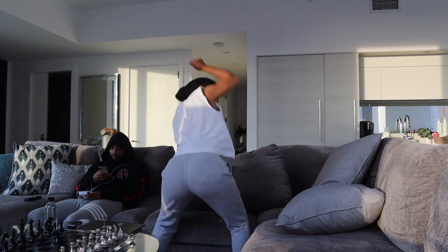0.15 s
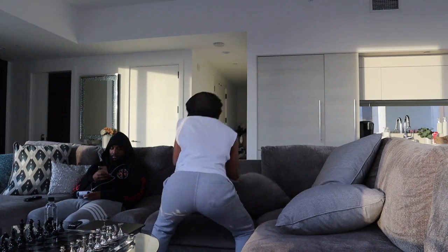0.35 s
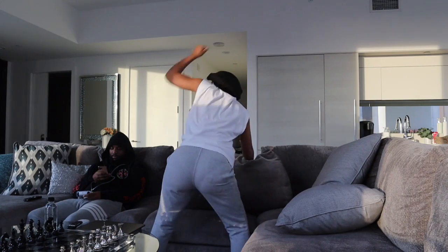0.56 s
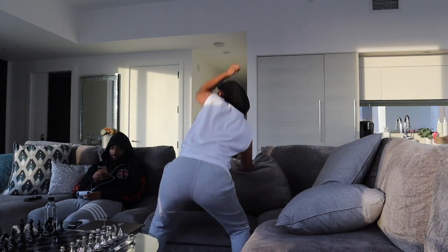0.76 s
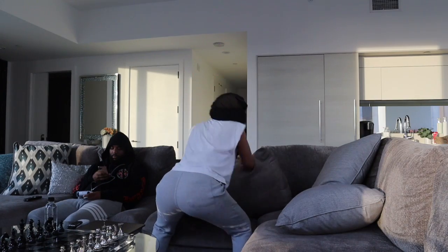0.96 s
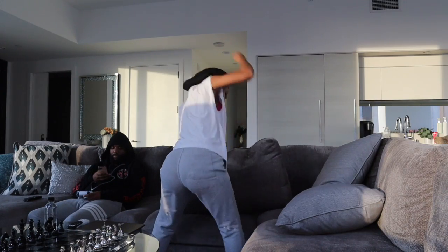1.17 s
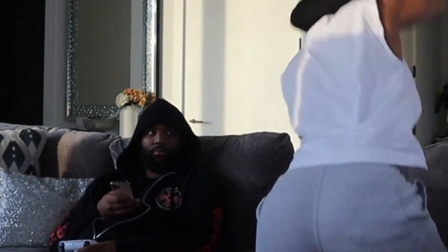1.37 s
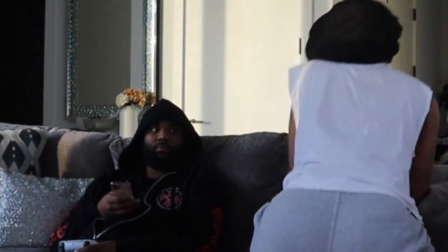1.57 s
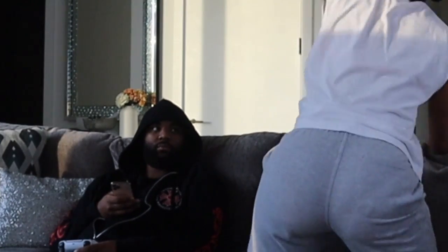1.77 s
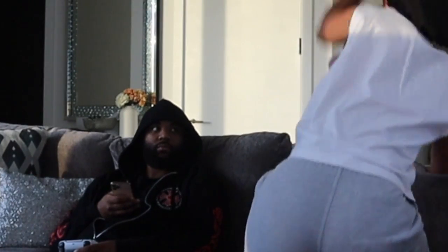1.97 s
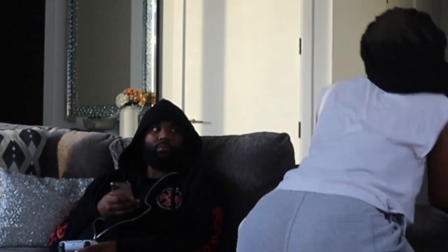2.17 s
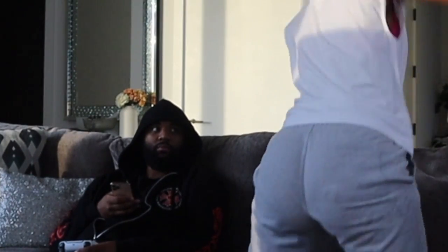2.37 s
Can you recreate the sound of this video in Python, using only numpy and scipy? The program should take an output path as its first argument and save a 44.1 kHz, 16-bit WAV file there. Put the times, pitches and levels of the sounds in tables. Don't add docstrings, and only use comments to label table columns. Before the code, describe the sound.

A hand whacks a soft couch cushion four times, boomy thuds ringing briefly in a hard-walled room

```python
import sys
import numpy as np
from scipy import signal
from scipy.fft import rfft, irfft
from scipy.io import wavfile
from scipy.ndimage import uniform_filter1d

SR = 44100
rng = np.random.default_rng(int(sys.argv[2]) if len(sys.argv) > 2 else 0)


def volts_from_decibels(level):
    exponent = np.asarray(level, float) / 20
    return 10 ** exponent


def persist_wave(psi):
    counts = np.round(np.clip(psi, -1, 1) * 32767).astype(np.int16)
    wavfile.write(sys.argv[1], SR, np.atleast_2d(counts).T)


N = 107207

# f/Hz, level per Hz/dB
HISS = [(13, -38), (22, -3.5), (225, -6), (280, -11.5), (377, -9.5), (409, -16), (702, -15), (782, -16.5),
        (14200, -44.5)]
# f/Hz, side over mid/dB
HISS_SIDE = [(60, -15), (110, -20), (200, -7.5), (370, -3.5), (670, -0.5), (1230, 2), (2240, 4), (4100, 5),
             (7490, 4), (13700, 3.5)]
# f/Hz, rms level/dB, width/Hz
HUM = [
    (35.3, -71, 3.3),
    (78.3, -51, 4.4),
    (376, -54, 2.06),
    (690, -108, 3.1),
]
# f/Hz, level/dB
RUSTLE = [(100, -5.5), (400, 10), (1000, -3.8), (2500, -9.5), (5000, -20), (9000, -41), (14000, -42)]
# t/s, level/dB, f/Hz
TICKS = [
    (0.042, -54, 4960),
    (0.049, -48.5, 2830),
    (1.128, -55, 11000),
    (1.135, -50.5, 10500),
]
# t/s, level/dB, push length/ms, slap level/dB, blow index
CONTACTS = [(0.3397, -8.5, 1.4, -15, 0), (0.3428, -3.5, 0.43, -22, 0), (0.3472, -14, 1.6, -22, 0),
            (0.3493, 1, 1.25, -1.5, 0), (0.3513, -3, 0.8, -12, 0), (0.3552, 1.5, 2.1, -29, 0),
            (0.933, -9, 2.3, -20, 1), (0.9407, -9, 1.67, -11, 1), (0.9424, -11.5, 1.02, 2, 1),
            (0.9466, -1, 2.17, -32, 1), (1.493, -35, 1.6, -40, 2), (1.516, -28, 2.6, -44, 2),
            (1.5233, -22, 2, -40, 2), (1.536, -28, 1.4, -14, 2), (1.541, -20, 0.61, -44, 2),
            (1.545, -25, 0.6, -24, 2), (1.5508, -15.5, 0.45, -48, 2), (1.5619, -14, 1.4, -43, 2),
            (2.1142, -0.5, 1.33, -29, 3), (2.1180, -11, 1.6, -30, 3), (2.1207, -2.5, 0.84, -18, 3),
            (2.1223, -3, 0.94, -28, 3), (2.1259, -2, 3.6, -31, 3)]
# t/s, cushion thud f/Hz, thud level/dB, rustle level/dB, room level/dB
BLOWS = [
    (0.340, 112.6, -27, -48.5, 10.5),
    (0.934, 143.4, -25, -59.5, 8.5),
    (1.516, 63, -23, -53.5, 3),
    (2.114, 147, -34, -38.5, 8),
]
# f/Hz, level/dB
SWISH = [(2500, -15), (5000, -6.5), (8000, -8), (11500, 1.5), (14000, -12)]
SWISH_SHARES = (0.5, -0.5, 3, 0.5)
SINK_TIMES = (3.4, 2.9, 15.5, 3.9)
# f/Hz, level per Hz/dB
FIRST_SPOT = [(40, -1.5), (168, .5), (290, -15.5), (560, -9), (1000, -23.5), (2200, -23.5), (2800, -36.5),
              (11100, -59)]
SECOND_SPOT = [(40, -11), (130, 0.5), (290, -11), (900, -14.5), (1250, -24.5), (3900, -37), (6500, -53.5),
               (13000, -59)]
THIRD_SPOT = [(40, 1.5), (177, -0.5), (290, -9.5), (760, -7.5), (1100, -21.5), (2500, -29), (5000, -40.5),
              (13000, -54)]
FOURTH_SPOT = [(40, -7.5), (223, 0.6), (320, -19.5), (500, -6), (750, -13), (2200, -31), (2800, -41),
               (13000, -61.5)]
SPOTS = (FIRST_SPOT, SECOND_SPOT, THIRD_SPOT, FOURTH_SPOT)
# f/Hz, level/dB, T60/s
ROOM_MODES = [(64.6, -2.5, 0.47), (169.05, -4, 0.65), (232.8, 3.5, 0.31), (276.2, -6, 0.4),
              (347.2, -14.5, 0.43), (460.6, -12.5, 0.9), (505, -21.5, 0.26), (591, -22, 0.6)]
# f/Hz, T60/s
TAIL_T60 = [(40, 0.58), (120, 0.49), (400, 0.53), (1500, 0.73), (4000, 0.6), (10000, 0.66)]
# f/Hz, side over mid/dB
TAIL_SIDE = [(60, -21), (110, -54), (200, -16), (370, -12.5), (670, -7.5), (1230, 0.5), (2240, 2),
             (4100, 6), (7490, 5.5), (13700, 4)]

HISS_DB, FLICKER_DB = -47.5, 1.2
HUM_TONE_HZ, HUM_TONE_DB = 373, -64
EARLIER_RUSTLE_DB, RUSTLE_GRAIN_DB = -44, 1.5
RUSTLE_RISE_S, RUSTLE_T60_S = 0.01, 2.12
SLAP_HZ, SLAP_Q, SLAP_S = 1750, 0.9, 0.00007
REBOUND, REBOUND_LATE = 0.51, 2.9
THUD_T60_S, THUD_RISE_S, THUD_SAG = 0.335, 0.011, 0.36
SWISH_DB, SWISH_RISE_S, SWISH_T60_S = -61.5, 0.11, 2.02
BRUSH_S, BRUSH_DB, BRUSH_MS = 1.484, -20.5, 3.6
MODES_DB, SPARSE_DB, SPARSE_S = -25.5, 4, 0.078
DIRECT_SIDE_DB = -27.5
BOTTOM_HZ, TOP_HZ, LIMIT = 37.6, 13400, 0.88


def curve(table, hz):
    f, v = np.array(table, float).T
    return np.interp(np.log(np.maximum(hz, 1)), np.log(np.maximum(f, 1)), v)


def colour(x, table):
    n = x.shape[-1]
    return irfft(rfft(x) * volts_from_decibels(curve(table, np.fft.rfftfreq(n, 1 / SR))), n)


def unit(x):
    return x / np.sqrt(np.mean(x ** 2))


def walk(rate):
    k = int(SR / rate)
    return unit(uniform_filter1d(uniform_filter1d(rng.standard_normal(N), k), k))


def peak(x, hz, q):
    return signal.lfilter(*signal.iirpeak(min(hz, 0.4 * SR), q, fs=SR), x)


def wide(pair, side):
    s = colour(pair[1], side)
    return np.array([pair[0] + s, pair[0] - s])


def hiss():
    pair = colour(rng.standard_normal((2, N)), HISS)
    return wide(pair / np.std(pair[0]) * volts_from_decibels(HISS_DB + FLICKER_DB * walk(18)), HISS_SIDE)


def appliances():
    hum = 0
    for hz, db, width in HUM:
        once = peak(rng.standard_normal(N), hz, hz / width)
        hum = hum + volts_from_decibels(db) * unit(peak(once, hz, hz / width))
    cycles = np.cumsum(HUM_TONE_HZ * (1 + 0.0067 * walk(1.38))) / SR
    return hum + volts_from_decibels(HUM_TONE_DB + 1.8 * walk(12)) * np.sin(2 * np.pi * cycles)


def rustle():
    t = np.arange(N) / SR
    envelope = volts_from_decibels(EARLIER_RUSTLE_DB - 84 * t)
    for s, _, _, db, _ in BLOWS:
        since = np.maximum(t - s, 0)
        envelope = envelope + volts_from_decibels(db - 60 * since / RUSTLE_T60_S) * (1 - np.exp(-since / RUSTLE_RISE_S))
    grains = rng.standard_normal((2, N)) * volts_from_decibels(RUSTLE_GRAIN_DB * walk(450))
    return wide(unit(colour(grains, RUSTLE)) * envelope, HISS_SIDE)


def ticks():
    t, out = np.arange(N) / SR, 0
    for s, db, hz in TICKS:
        decay = np.exp(-np.maximum(t - s, 0) / 0.0046) * (t > s)
        out = out + 3 * volts_from_decibels(db) * peak(rng.standard_normal((2, N)), hz, 1.34) * decay
    return wide(out, HISS_SIDE)


def hand(blow):
    t, out = np.arange(N) / SR, 0
    for s, db, ms, slap_db, k in CONTACTS:
        if round(k) == blow:
            u = np.maximum(t - s, 0) / (ms / 2400)
            late = u / REBOUND_LATE
            push = u ** 2 * np.exp(2 - 2 * u) - REBOUND * late ** 2 * np.exp(2 - 2 * late)
            pulse = np.exp(-((t - s - ms / 3000) / SLAP_S) ** 2)
            slap = peak(pulse, SLAP_HZ, SLAP_Q)
            out = out + volts_from_decibels(db) * (push + volts_from_decibels(slap_db + 4.5) * slap)
    return out


def cushion(s, hz, db):
    t = np.maximum(np.arange(N) / SR - s, 0)
    sag = THUD_SAG * THUD_T60_S / 3 * (1 - np.exp(-3 * t / THUD_T60_S))
    envelope = volts_from_decibels(db - 60 * t / THUD_T60_S) * (1 - np.exp(-t / THUD_RISE_S))
    return envelope * np.sin(2 * np.pi * hz * (t + sag))


def escaping_air():
    t, flow = np.arange(N) / SR, 0
    for (s, *_), share_db in zip(BLOWS, SWISH_SHARES):
        since = np.maximum(t - s, 0)
        decay = volts_from_decibels(SWISH_DB + share_db - 60 * since / SWISH_T60_S)
        flow = flow + decay * (1 - np.exp(-since / SWISH_RISE_S))
    return wide(unit(colour(rng.standard_normal((2, N)), SWISH)) * flow, HISS_SIDE)


def room(s, db, sink_ms, spot):
    t = np.arange(SR) / SR
    f = np.fft.rfftfreq(SR, 1 / SR)
    lumps = volts_from_decibels(SPARSE_DB * np.exp(-t / SPARSE_S) * np.repeat(rng.standard_normal(SR // 63), 63))
    spectrum = rfft(rng.standard_normal((2, SR)) * lumps) * volts_from_decibels(curve(spot, f))
    tail = 0
    for hz in 22 * 2 ** np.arange(0, 9.6, 0.5):
        weight = np.clip(1 - 2 * np.abs(np.log2(np.maximum(f, 1) / hz)), 0, 1)
        tail = tail + irfft(spectrum * weight, SR) * volts_from_decibels(-60 * t / curve(TAIL_T60, hz))
    modes = 0
    for hz, mode_db, t60 in ROOM_MODES:
        phase = rng.uniform(0, 2 * np.pi)
        modes = modes + volts_from_decibels(mode_db - 60 * t / t60) * np.sin(2 * np.pi * hz * t + phase)
    onset = (1 - np.exp(-1000 * t / sink_ms)) ** 2
    out = (wide(tail, TAIL_SIDE) + volts_from_decibels(MODES_DB) * modes) * volts_from_decibels(db) * onset * (1 - t ** 4)
    return np.pad(out, ((0, 0), (int(s * SR), N)))[:, :N]


def scene():
    out = hiss() + appliances() + rustle() + ticks() + escaping_air()
    out = out + room(BRUSH_S, BRUSH_DB, BRUSH_MS, THIRD_SPOT)
    for k, (s, hz, thud_db, _, room_db) in enumerate(BLOWS):
        hit = hand(k)
        mid = hit + cushion(s, hz, thud_db)
        side = volts_from_decibels(DIRECT_SIDE_DB) * colour(np.gradient(hit) * 7, [(100, 7), (1000, -28), (5000, -22)])
        out = out + np.array([mid + side, mid - side]) + room(s, room_db, SINK_TIMES[k], SPOTS[k])
    return out


def roll_off(x):
    return signal.sosfilt(signal.butter(12, 14300, fs=SR, output="sos"), x)


def record(dry):
    bass_cut = signal.butter(3, BOTTOM_HZ, "high", fs=SR, output="sos")
    top_cut = signal.butter(8, TOP_HZ, fs=SR, output="sos")
    x = signal.sosfilt(bass_cut, dry)
    limited = LIMIT * np.tanh(x / LIMIT)
    mix = signal.sosfilt(top_cut, limited)
    return roll_off(mix)


dry = scene()
out = record(dry)
persist_wave(out)
```